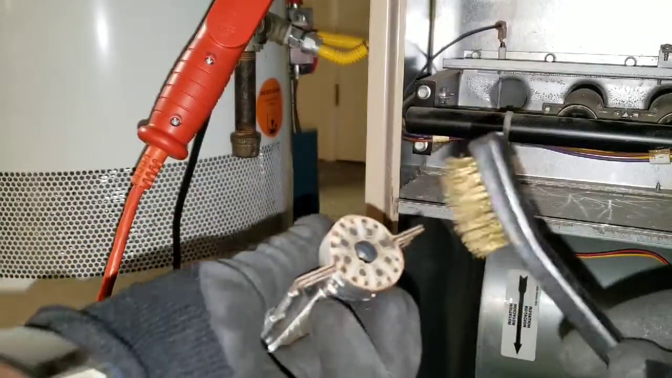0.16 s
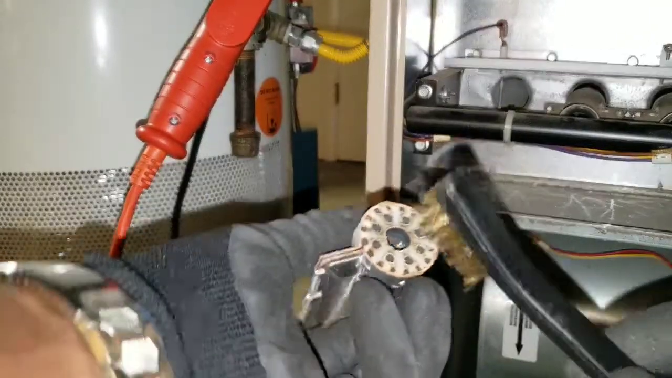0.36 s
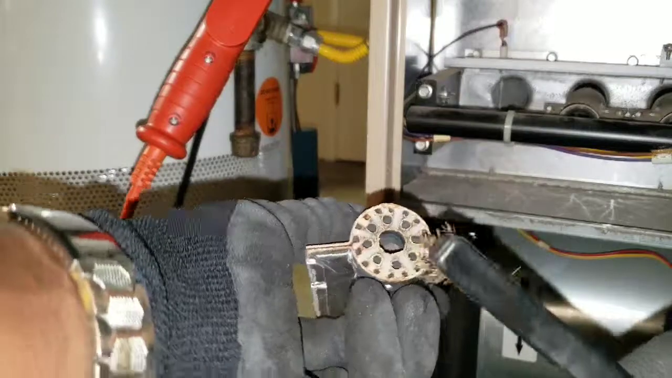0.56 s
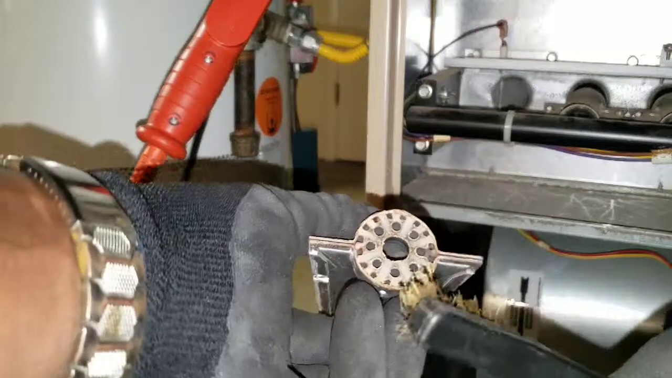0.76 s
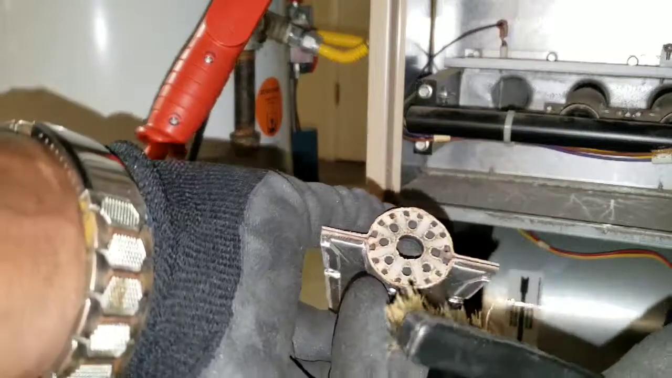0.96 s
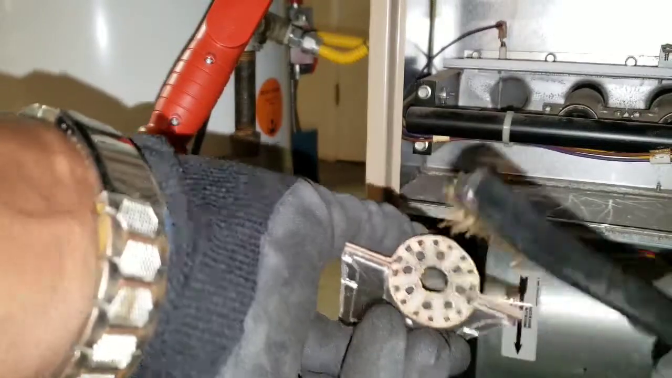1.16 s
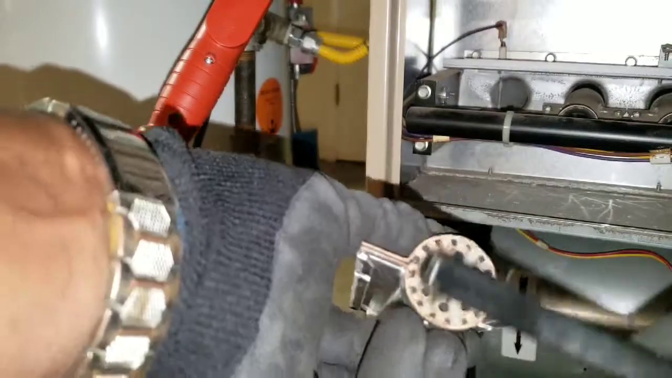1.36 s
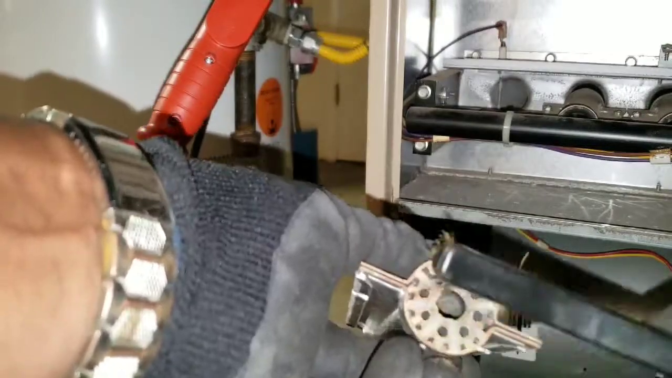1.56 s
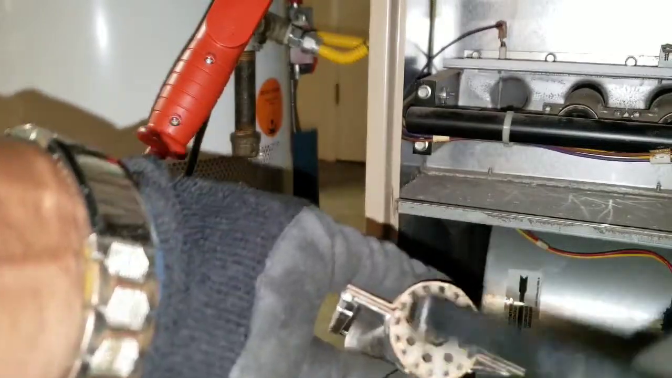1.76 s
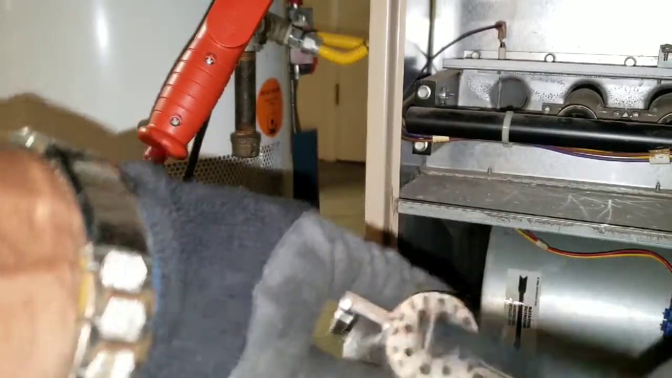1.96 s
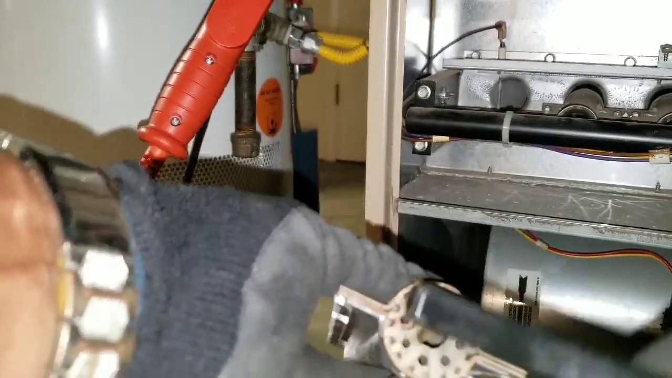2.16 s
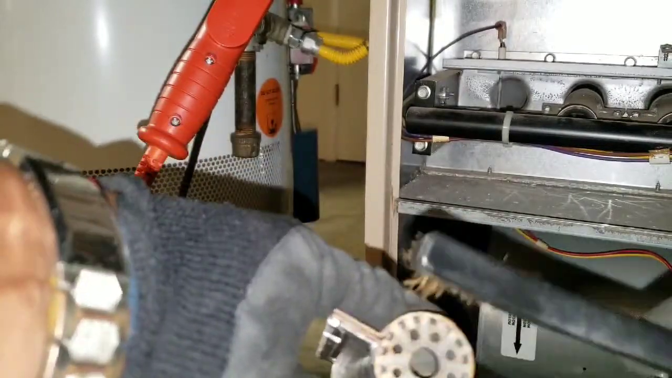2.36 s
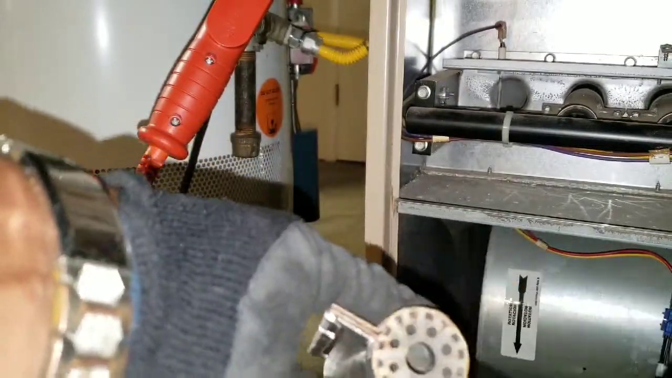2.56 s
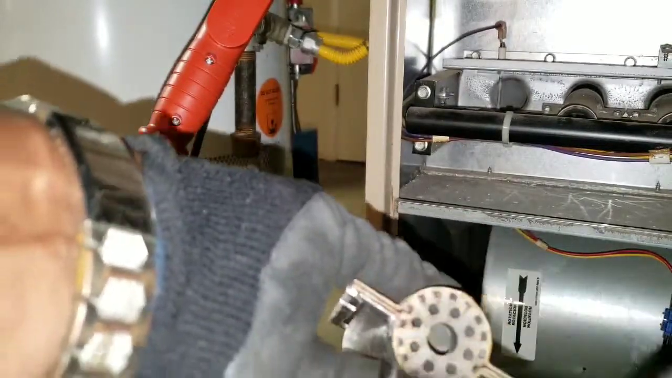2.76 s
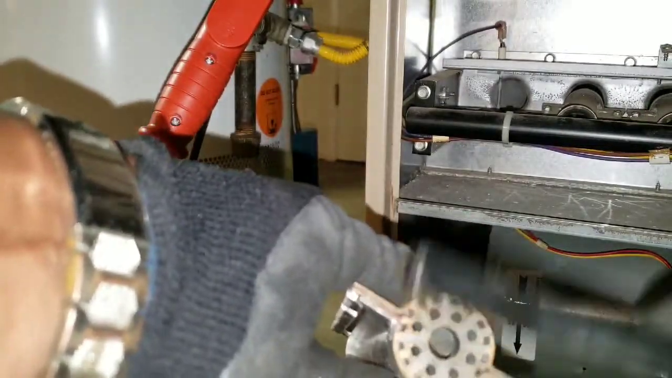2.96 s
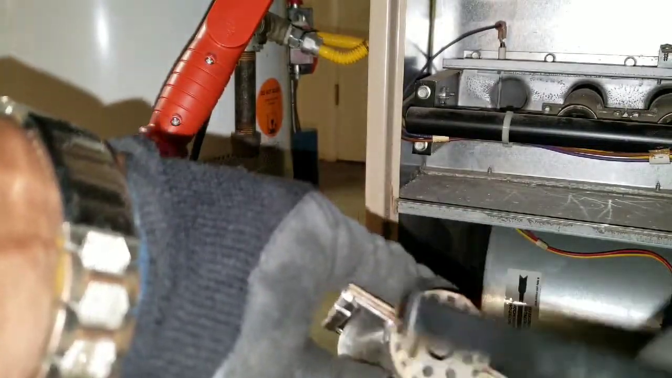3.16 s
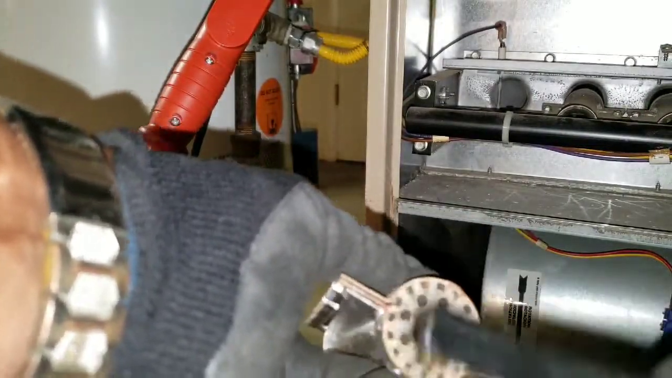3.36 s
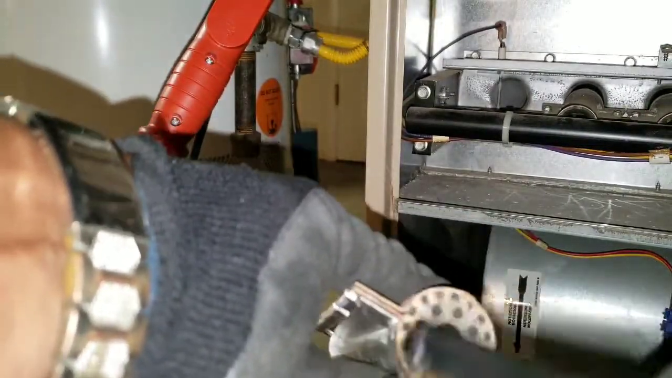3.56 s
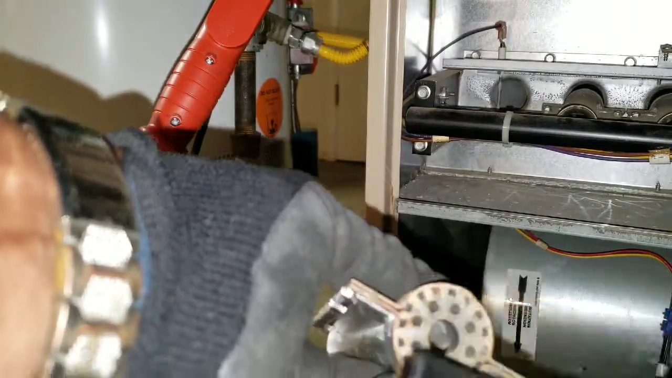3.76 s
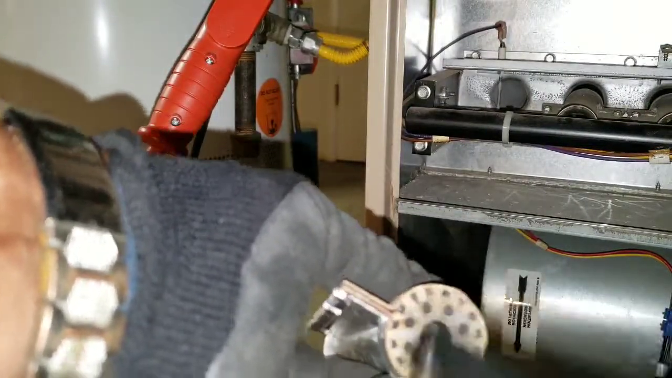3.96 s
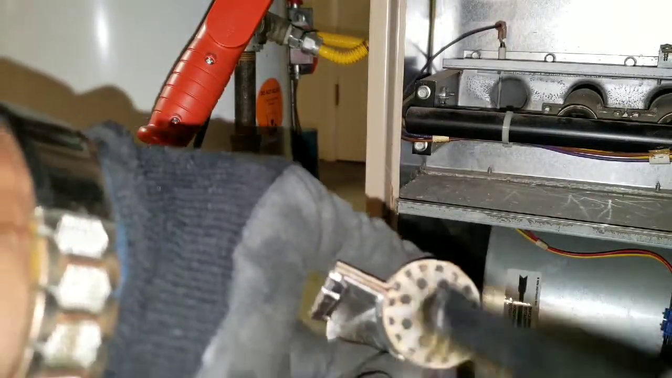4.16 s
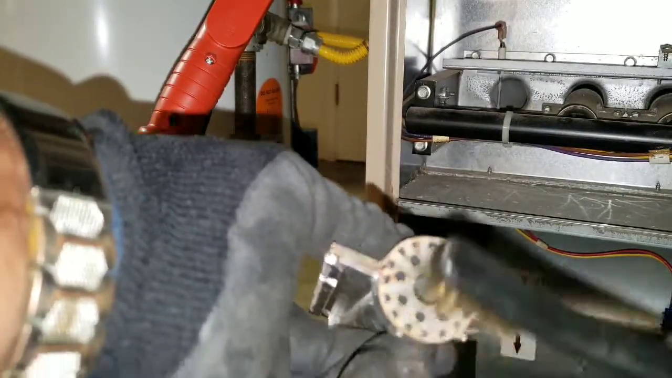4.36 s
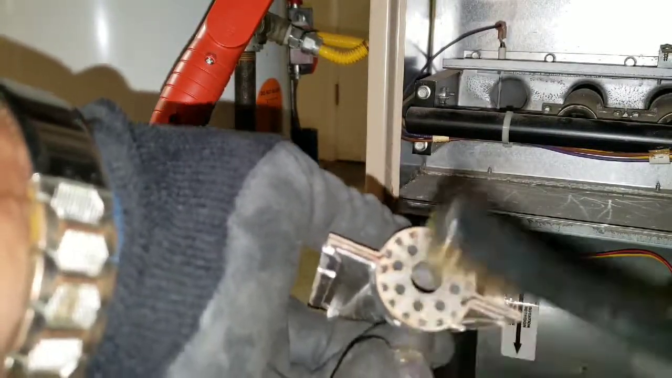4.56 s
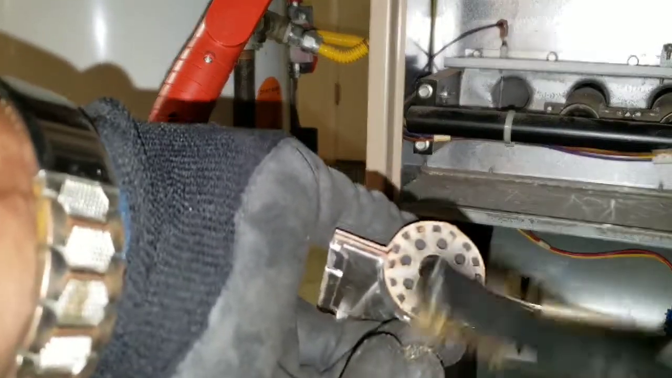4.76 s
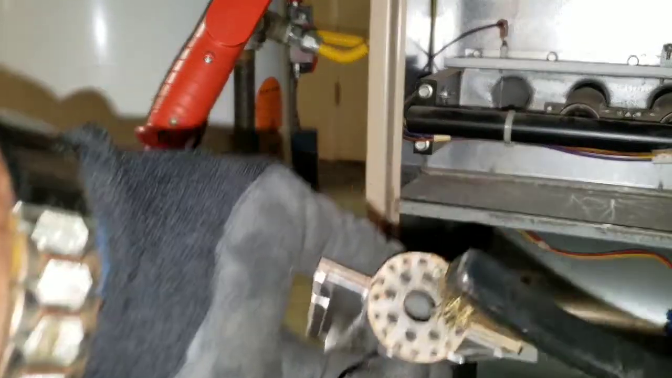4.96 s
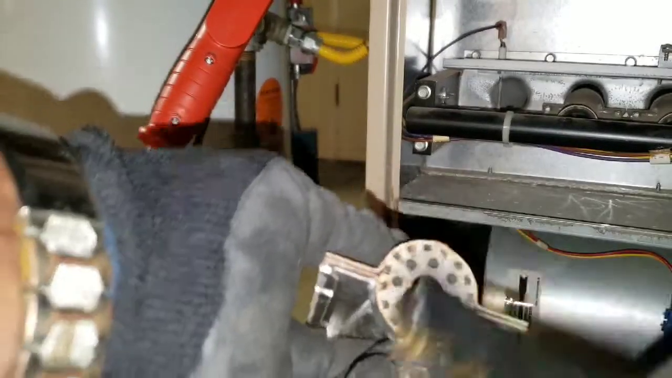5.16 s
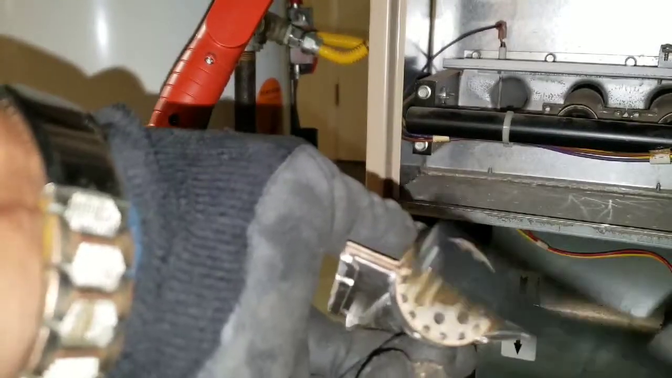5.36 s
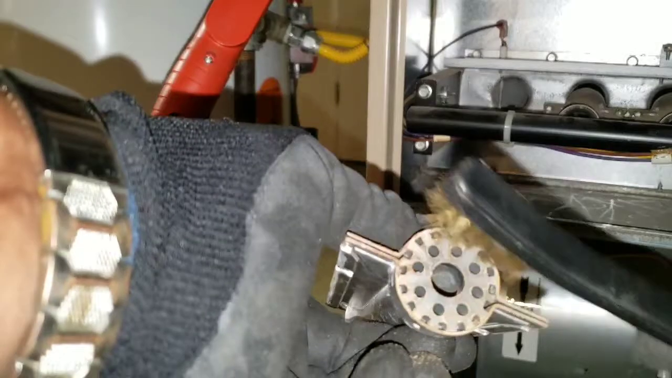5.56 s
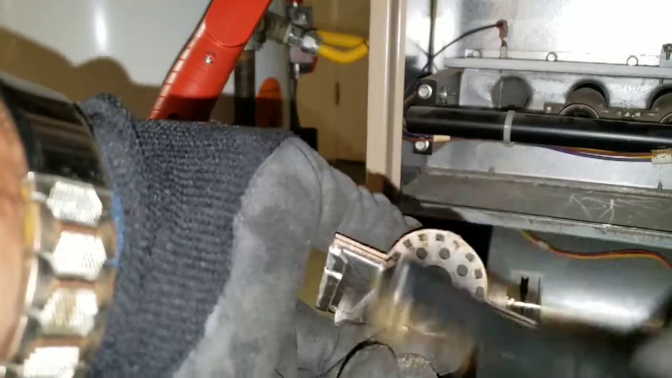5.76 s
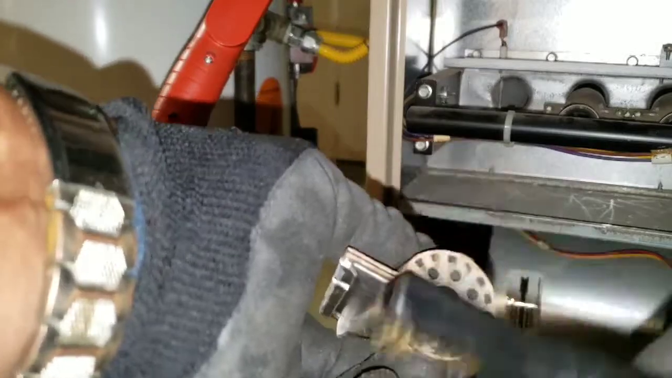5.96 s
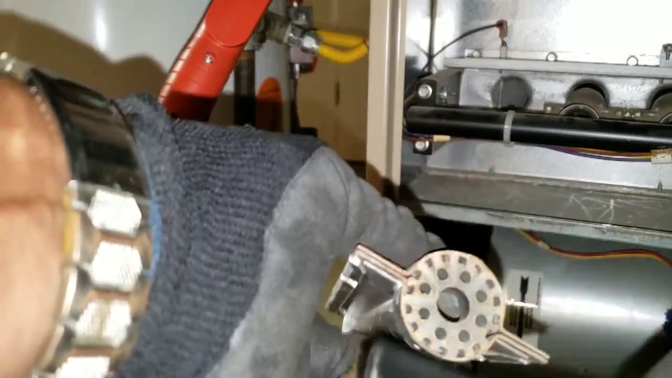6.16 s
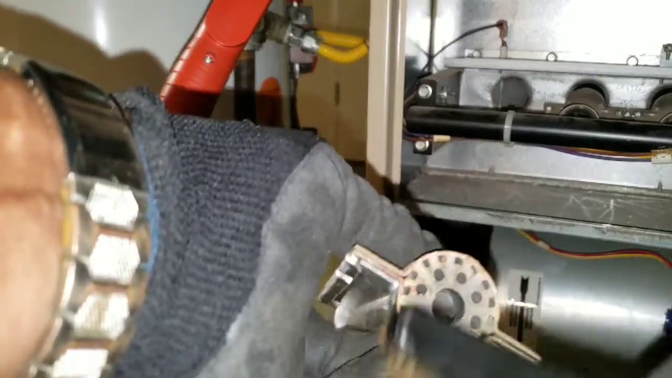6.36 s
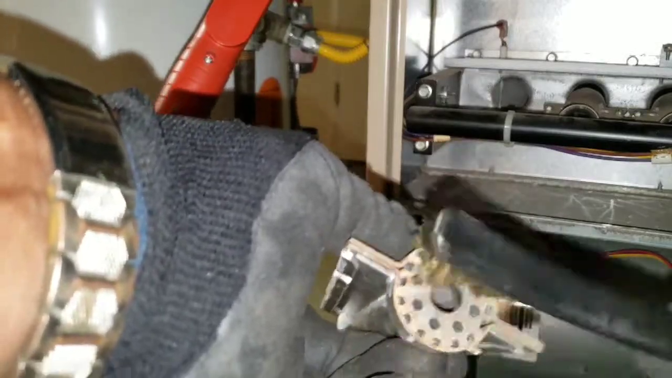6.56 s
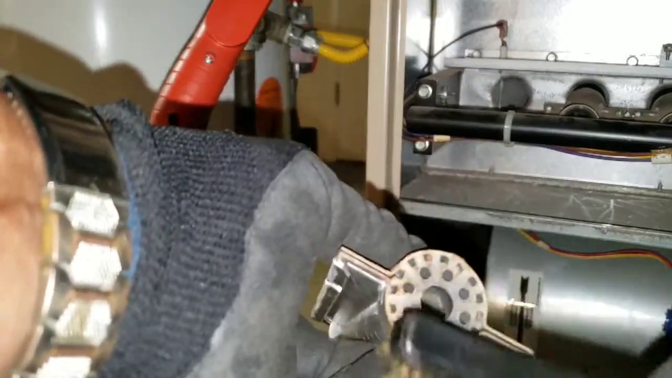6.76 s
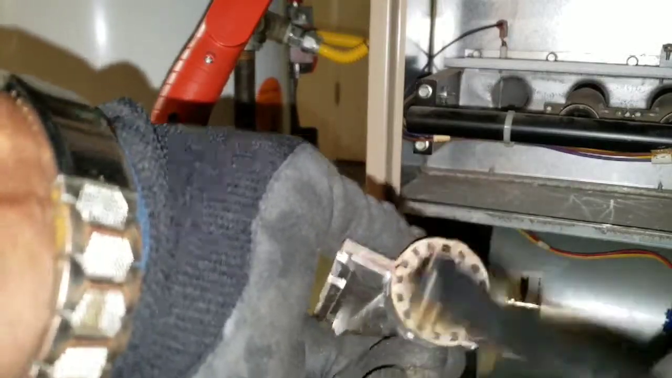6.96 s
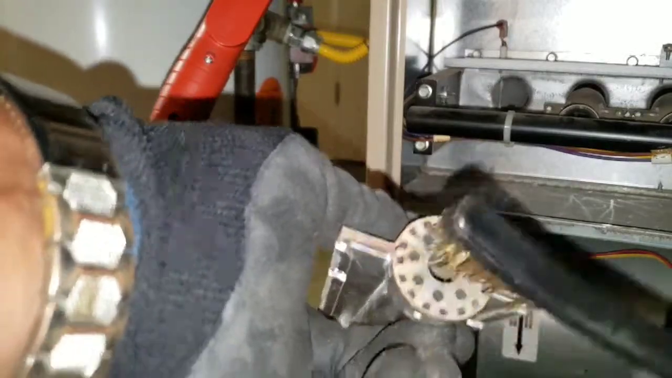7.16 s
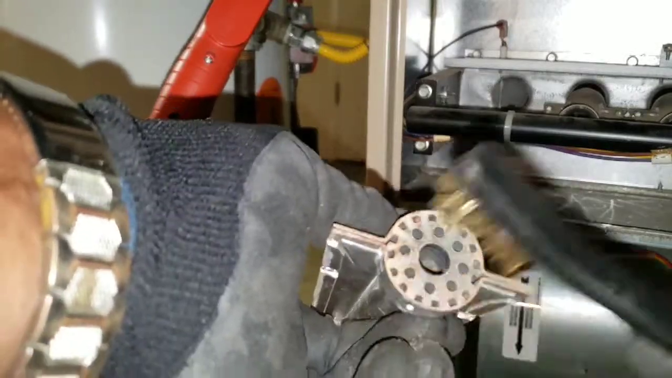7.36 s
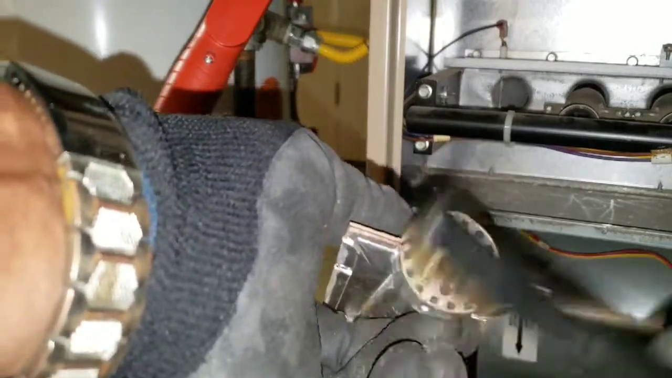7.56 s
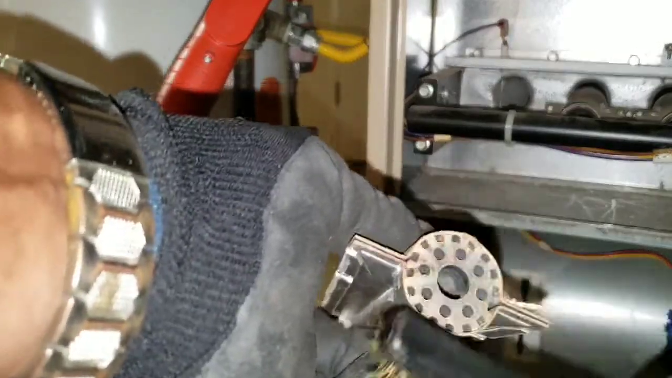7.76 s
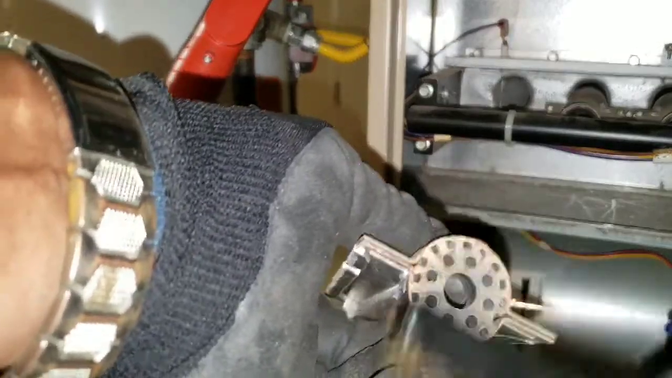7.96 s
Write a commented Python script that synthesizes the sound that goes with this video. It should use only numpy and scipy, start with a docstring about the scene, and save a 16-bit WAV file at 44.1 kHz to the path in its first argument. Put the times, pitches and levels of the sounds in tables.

```python
"""A small wire brush scrubs a metal burner held in a gloved hand, about four strokes a second. Random impulses
of wire tips, catching wires and pressed tufts pass through broad filters, while tips and tuft snaps also excite
faint, damped modes of the burner and the brush handle. The glove rustles, ticks and squeaks first. A short
diffuse tail makes the room small and dry; a low machine hum, a narrow rumble and room air lie behind."""
import sys
import numpy as np
from scipy import signal
from scipy.fft import rfft, irfft, next_fast_len
from scipy.io import wavfile

SR = 44100
rng = np.random.default_rng(int(sys.argv[2]) if len(sys.argv) > 2 else 0)


def wav_record(signal):
    """Record a signal, one row per channel, as 16-bit PCM in the file named by sys.argv[1]."""
    frames = np.transpose(np.atleast_2d(signal))
    bounded = np.clip(frames, -1, 1)
    # unit amplitude maps onto the largest positive 16-bit level
    quanta = np.round(bounded * 32767).astype(np.int16)
    wavfile.write(sys.argv[1], SR, quanta)


N = 353726  # length [samples]


def gain_of(db):
    """Logarithmic level: 20 dB is a factor of ten in amplitude."""
    return 10 ** (np.asarray(db) / 20)


def evened(x):
    """Power normalization: scales to an rms of one."""
    return x / np.sqrt(np.mean(x ** 2) + 1e-20)


def read(points, hz):
    """Interpolation along a logarithmic frequency axis."""
    f, value = np.transpose(points)
    return np.interp(np.log(hz + 1), np.log(f + 1), value)


def add(mix, s, sound):
    """Superposition: adds a sound into the mix in place, starting at s seconds."""
    part = mix[..., max(round(s * SR), 0):]
    part = part[..., :sound.shape[-1]]
    part += sound[..., :part.shape[-1]]


def colour(x, spectrum, band, size=4096):
    """Minimum-phase filtering: shapes the spectrum; white input keeps its rms within the band."""
    hz = abs(np.fft.fftfreq(size, 1 / SR))
    gain = gain_of(read(spectrum, hz))
    in_band = (hz > band[0]) * (hz < band[1])
    gain = gain / np.sqrt(np.mean(gain ** 2 * in_band))
    # the Hilbert transform of the log gain gives the phase of a causal filter
    response = np.exp(np.conj(signal.hilbert(np.log(gain))))
    taps = np.fft.ifft(response).real[:size // 2]
    return signal.oaconvolve(x, taps[None], axes=1)[:, :N]


def wander(length, rate_hz):
    """Low-passed random process: smooth chance with an rms of one."""
    size = next_fast_len(length, True)
    hz = np.fft.rfftfreq(size, 1 / SR)
    low_pass = (hz > 0) / (1 + (hz / rate_hz) ** 4)
    return evened(irfft(rfft(rng.standard_normal(size)) * low_pass, size)[:length])


def background(hum_hz=92.3, hum_db=-69, rumble_hz=56, rumble_width_hz=9, rumble_db=-71, lean_db=2.0):
    """Tonal and narrow-band noise: a machine's wavering hum and rumble over partly coherent room air."""
    # room air: (frequency [Hz], spectral density [dB per Hz, relative])
    air_spectrum = [(15, -33), (30, -14.5), (45, -15.5), (75, 1), (115, -6.5), (150, -15), (230, -25),
                    (275, -19), (340, -29.5), (600, -31.5), (2000, -34), (5000, -37), (9000, -40),
                    (14500, -35.5)]
    # left-right likeness of the air: (frequency [Hz], amplitude share [0..1])
    air_share = [(50, 1), (100, 0.8), (250, 0.59), (700, 0.087), (10000, 0.092)]
    air_db = -69.5
    size = next_fast_len(N, True)
    t, hz = np.arange(N) / SR, np.fft.rfftfreq(size, 1 / SR)
    left, apart = rfft(rng.standard_normal((2, size)))
    same = np.clip(read(air_share, hz), 0, 1)
    right = same * left + np.sqrt(1 - same ** 2) * apart
    air = irfft(np.array([left, right]) * gain_of(read(air_spectrum, hz)), size)[:, :N]

    hum_phase = 2 * np.pi * hum_hz * t + .5 * wander(N, 3)
    hum = evened(np.sin(hum_phase) * gain_of(3.0 * wander(N, 3.0)))

    envelope = wander(N, rumble_width_hz) + 1j * wander(N, rumble_width_hz)
    rumble = evened((envelope * np.exp(2j * np.pi * rumble_hz * t)).real)

    total = gain_of(air_db) * evened(air) + gain_of(hum_db) * hum + gain_of(rumble_db) * rumble
    return total * gain_of([[lean_db], [-lean_db]])  # left louder than right


def glove(squeak_db=-82, squeak_length_s=0.02, rise_hz_per_s=5000, tick_s=0.631, tick_db=-73, tick_length_s=0.005):
    """Friction noise: cloth rustles; the grip gives one faint tick and one tiny rising squeak."""
    # rustle as the hand gets ready, silent after the last row: (time [s], level [dB])
    rustle_levels = [(0, -70.5), (.08, -83), (.27, -74.5), (.34, -83.5), (.64, -96), (1.15, -102)]
    # colour of the rustling cloth: (frequency [Hz], spectral density [dB per Hz, relative])
    cloth = [(500, -10), (3500, -9.5), (5800, -11), (6700, -0.5), (7600, -3), (8600, -13), (11500, -4.5),
             (14500, -9)]
    # tick as the burner shifts in the grip: (frequency [Hz], spectral density [dB per Hz, relative])
    grip_shift = [(1000, -25), (2500, 2), (6000, -2), (9000, -13)]
    squeak_s, squeak_hz = 0.764, 3980
    t = np.arange(N) / SR
    level = gain_of(np.interp(t, *np.transpose(rustle_levels))) * (t < rustle_levels[-1][0])
    rustle = colour(level * rng.standard_normal((2, N)), cloth, (500, 14500))

    burst = gain_of(tick_db) * (t > tick_s) * np.exp(-abs(t - tick_s) / tick_length_s)
    tick = colour(burst * rng.standard_normal((2, N)), grip_shift, (2000, 7000))

    swell = gain_of(squeak_db) * np.exp(-((t - squeak_s) / squeak_length_s) ** 2)
    turns = np.cumsum(squeak_hz + rise_hz_per_s * (t - squeak_s)) / SR
    squeak = swell * np.sin(2 * np.pi * turns + wander(N, 70))  # the wandering phase roughens it
    return rustle + tick + squeak


def stroke(crest_s, length_s, crest_db, landing_db, drag_db, rasp_db, catch_db, scuff_db):
    """Contact force: tips, catching wires and tufts land, swell, ease off, drag over the rim and lift."""
    land_s, swell_curve, ease_s, lift_s = 0.01, 1.33, 0.04, 0.01
    scuff_share = 0.15  # share of the extra rasp that the low scuff takes
    t = np.arange(0, length_s + 6 * lift_s, 1 / SR)
    to_go = np.clip(1 - t / crest_s, 0, 1) ** swell_curve
    eased = np.clip((t - crest_s) / ease_s, 0, 1)
    hiss_db = crest_db + landing_db * to_go + drag_db * eased
    # the catching grows, or falls where catch_db is negative, from the crest to the rim
    caught_db = catch_db * np.interp(t, [crest_s, length_s], [0, 1])
    contact = np.minimum(t / land_s, 1) * np.exp(-np.maximum(t - length_s, 0) / lift_s)
    rasp_level = hiss_db + rasp_db + caught_db
    scuff_level = hiss_db + scuff_db + scuff_share * caught_db
    return contact * gain_of([hiss_db, rasp_level, scuff_level])


def slips(slip_hz=150, uneven=.45, fade_s=0.0034, spread_db=1.5):
    """Stick-slip: tufts jump out of the holes at uneven intervals; each jump dies away exponentially."""
    turns = np.cumsum(slip_hz * np.exp(uneven * wander(N, 90))) / SR
    jumps = np.diff(np.floor(turns), prepend=0)  # one impulse a whole turn
    jumps = jumps * gain_of(spread_db * np.clip(rng.standard_normal(N), -2, 2))
    return evened(signal.lfilter([1], [1, -np.exp(-1 / (fade_s * SR))], jumps))


def flicks(per_s, spread_db, clump_db, clump_hz):
    """Random impulse trains: wires stick and let go in clumps, in two independent channels."""
    size = gain_of(spread_db * np.minimum(rng.exponential(1, (2, N)), 5))
    sign = rng.choice([-1, 1], (2, N))
    struck = rng.random((2, N)) < per_s / SR
    return evened(size * sign * struck * gain_of(clump_db * wander(N, clump_hz)))


def brush(tip_jerk=0.67, catch_jerk=0.53):
    """Force-modulated impulses: strokes drive fine tip flicks, coarser catches and a low scuff."""
    # one row a stroke; levels drive the filters: (start [s], time to crest [s], length [s],
    # hiss at crest [dB], landing re crest [dB], dragging off re crest [dB], rasp re hiss [dB],
    # extra rasp by the end [dB], scuff re hiss [dB])
    stroke_rows = [(1.121, 0.097, 0.15, -47.5, -20, -21, -14.5, 22.5, -22),
                   (1.365, 0.104, 0.15, -49.5, -21, 0.0, -16.5, -0.5, -19),
                   (1.657, 0.008, 0.059, -57, 3, -10.5, -18, 10, -16),
                   (1.713, 0.063, 0.084, -43.5, -13, 0.5, -20, 2.0, -21),
                   (1.951, 0.12, 0.16, -46.5, -7, -26, -16, 8, -18),
                   (2.211, 0.094, 0.17, -40.0, -32.5, -16, -16.5, 17, -19.5),
                   (2.497, 0.076, 0.16, -40.5, -16.5, -25.5, -11.5, 17, -19),
                   (2.774, 0.061, 0.13, -44.0, -11.5, -12.5, -14, 0.5, -19),
                   (2.995, 0.075, 0.2, -45.5, -22, -5.5, -15.0, 2.5, -19),
                   (3.243, 0.11, 0.16, -47.5, -8.5, -4, -15, 4, -19.5),
                   (3.484, 0.062, 0.11, -44, -13.5, -8, -14.0, 0, -20.5),
                   (3.698, 0.082, 0.13, -40.5, -20, -14.5, -16, 3.5, -19.5),
                   (3.93, 0.058, 0.12, -37, -27, -15.5, -18, 9.5, -19),
                   (4.158, 0.061, 0.12, -37.5, -30, -13.5, -15, 10, -17.5),
                   (4.433, 0.031, 0.1, -41.5, -17.5, -11.5, -15.0, 3, -19),
                   (4.647, 0.05, 0.11, -54, 0.5, -7, -21, 2.0, -16.5),
                   (4.76, 0.04, 0.1, -45, -24, -30.5, -18, 12, -26),
                   (4.915, 0.028, 0.1, -39.5, -10.0, -12, -14.0, 2, -19.5),
                   (5.137, 0.073, 0.14, -40, -19.5, -22, -10, 15.5, -22.5),
                   (5.387, 0.077, 0.14, -40, -16, -14.5, -13, 20, -17.5),
                   (5.648, 0.032, 0.11, -47.0, -20, -7.5, -11, -3.0, -17),
                   (5.887, 0.066, 0.1, -39.5, -15.5, -41.5, -12, 19, -17),
                   (6.11, 0.068, 0.13, -43.5, -10, -12, -15.5, 9, -18),
                   (6.373, 0.074, 0.15, -43.0, -23.5, -13.5, -14, -1, -18),
                   (6.688, 0.089, 0.13, -42, -20.5, -13, -15, 1.5, -22),
                   (6.956, 0.058, 0.12, -38, -21.5, -18, -14.0, 16, -18),
                   (7.215, 0.038, 0.13, -42.5, -9, -10, -15, 14.5, -14),
                   (7.464, 0.073, 0.13, -40, -17.5, -30, -11, 22.5, -18.5),
                   (7.707, 0.067, 0.13, -40.5, -17.5, -28, -11, 21, -16.5),
                   (7.937, 0.066, 0.078, -43, -11.5, -6, -14.0, -2, -14)]
    tremble_db, tremble_hz = 0.83, 45  # the brush bumps over the holes
    force = np.zeros((3, N))
    for start, *shape in stroke_rows:
        add(force, start, stroke(*shape))
    force = force * gain_of(tremble_db * wander(N, tremble_hz))

    jerks = slips()  # one set of jerks shakes both tips and catching wires
    tips = flicks(per_s=16000, spread_db=2.0, clump_db=1, clump_hz=130)
    tips = tips * evened(np.hypot(1, tip_jerk * jerks))
    catches = flicks(per_s=4000, spread_db=2.0, clump_db=-1.5, clump_hz=165)
    catches = catches * evened(np.hypot(1, catch_jerk * jerks))
    tufts = flicks(per_s=1500, spread_db=1.5, clump_db=1.0, clump_hz=120)
    return force[0] * tips, force[1] * catches, force[2] * tufts


def snaps(snap_s=0.0043, knock_s=0.0017, size=1024):
    """Impulsive noise: a whole tuft snaps onto or off an edge, a burst decaying within milliseconds."""
    # tuft snaps, levels ahead of the filters: (time [s], bright snap [dB], dull knock [dB])
    snap_rows = [(1.183, -43.5, -62), (1.233, -45.5, -47), (1.272, -55, -42), (1.281, -59, -48.5),
                 (1.372, -60, -76), (2.062, -39, -69), (2.21, -48.5, -67), (2.222, -45.5, -72),
                 (2.357, -59, -43.5), (2.381, -57, -58), (2.569, -50, -44.5), (2.656, -46, -66),
                 (3.934, -47, -71), (4.167, -60, -75), (4.189, -42, -56), (4.212, -33, -56),
                 (4.26, -58, -40), (4.649, -52, -75), (4.682, -39.5, -55), (4.789, -42.5, -74),
                 (4.916, -46, -51), (5.139, -60, -65), (5.233, -34, -39.5), (5.482, -54, -37),
                 (5.518, -45, -47), (5.934, -52, -38), (6.955, -48.5, -56), (6.984, -38, -61),
                 (7.001, -36.5, -60), (7.071, -52, -44.5), (7.232, -38, -48), (7.282, -33.5, -37.5),
                 (7.345, -49, -40.5), (7.539, -46, -57), (7.94, -49.5, -66)]
    bright, dull = np.zeros((2, N))
    t = np.arange(size) / SR
    for s, snap_db, knock_db in snap_rows:
        add(bright, s, gain_of(snap_db) * np.exp(-t / snap_s))
        add(dull, s, gain_of(knock_db) * np.exp(-t / knock_s))
    return bright * rng.standard_normal((2, N)), dull * rng.standard_normal((2, N))


def burner(drive, ring_db=-15, size=16384):
    """Modal resonance: the wires excite the decaying modes of the burner and the brush handle, damped more or
    less by the glove."""
    # modes of the burner, the three lowest from the brush handle: (frequency [Hz], relative level [dB], 60 dB
    # decay time [s])
    modes = [(1214, -16, .03), (1432, -14, .035), (1678, -16, .04), (2956, -2.5, .05), (3070, -4, .035),
             (3439, -10, .06), (3867, -12, .05), (4685, -4, .09), (4843, -6.5, .09), (5763, -6, .075),
             (6215, -11, .03), (9894, -14, .03), (11846, -13, .04), (13790, -10, .04), (14412, -12, .04)]
    # how freely the burner rings as the grip shifts: (time [s], level re ring_db [dB])
    freedom = [(1.2, -0.5), (2.1, 3), (2.6, -3), (3.4, 3), (4.0, 1), (4.8, 6.5), (5.3, -5.5), (7.0, 2),
               (8.0, 0.5)]
    t = np.arange(size) / SR
    ring = np.zeros(size)
    for hz, db, t60 in modes:
        decay = gain_of(-60 * t / t60)
        ring += gain_of(db) * evened(decay * np.cos(2 * np.pi * hz * t))
    free = gain_of(ring_db + np.interp(np.arange(N) / SR, *np.transpose(freedom)))
    return signal.oaconvolve(drive * free, ring[None] / np.sqrt(size), axes=1)[:, :N]


def patchy(x, patchy_db=3.5, width_hz=260, last_s=0.039, size=512):
    """Time-varying filtering: smooth random gains make the noise patchy, its colour changing softly."""
    hz, t, z = signal.stft(x, SR, nperseg=size, noverlap=size * 3 // 4)
    across, along = np.fft.rfftfreq(len(hz), hz[1]), np.fft.fftfreq(len(t), t[1])
    # random gains, smoothed over frequency and over time
    smooth = np.exp(-(across * width_hz) ** 2 - (along[:, None] * last_s) ** 2)
    grain = np.fft.rfft2(rng.standard_normal((2, len(t), len(hz))))
    field = evened(np.fft.irfft2(grain * smooth, (len(t), len(hz))))
    gain = evened(gain_of(patchy_db * np.clip(field, -3, 2))).transpose(0, 2, 1)
    return signal.istft(z * gain, SR, nperseg=size, noverlap=size * 3 // 4)[1][:, :N]


def wires(tips, catches, tufts, hiss_db=-0.5, rasp_db=-1, scuff_db=-3.5):
    """Source-filter principle: broad spectra turn the contact impulses into hiss, rasp and scuff."""
    # wire tips: (frequency [Hz], spectral density [dB per Hz, relative])
    tip_spectrum = [(300, -17), (700, -10), (1200, -18), (2300, -15), (3200, 3.5), (4200, 2.5), (5500, 6.5),
                    (7000, 7.5), (8700, 3), (10500, 6), (13000, 7), (15000, 4)]
    # catching wires: (frequency [Hz], spectral density [dB per Hz, relative])
    catch_spectrum = [(200, -19), (600, -23), (900, -11), (1300, -1), (1750, 0.5), (2300, -1), (3200, -1),
                      (4300, -3), (7000, -9.5), (15000, -35)]
    # pressed tufts: (frequency [Hz], spectral density [dB per Hz, relative])
    tuft_spectrum = [(60, 2.5), (150, 1), (275, 2), (360, -0.5), (470, -1), (620, -3), (780, 2.5),
                     (1050, -1.5), (1400, -14.5), (2500, -32.5)]
    hiss = colour(tips, tip_spectrum, (4000, 14500))
    rasp = colour(catches, catch_spectrum, (1000, 2500))
    scuff = colour(tufts, tuft_spectrum, (250, 850))
    scuff = patchy(scuff, patchy_db=7.5, width_hz=84, last_s=0.064, size=1024)
    return gain_of(hiss_db) * hiss + gain_of(rasp_db) * rasp + gain_of(scuff_db) * scuff


def ports(trains):
    """Partial coherence: part of the sound reaches both microphone ports alike, part differs."""
    # likeness of the ports, clipped below to 0...0.9: (frequency [Hz], amplitude share)
    port_share = [(100, 0.6), (500, -0.2), (1200, 1.5), (1800, -0.9), (2400, 0.85), (4500, -0.24),
                  (7000, 0.43), (14000, -0.2)]
    # phase lead of the left port: (frequency [Hz], lead [rad])
    left_lead = [(100, 1.5), (3900, 0.86), (4650, 7.5), (5100, -8.5), (5800, -14), (6700, -10.5),
                 (7800, -17), (9700, -13.5), (10400, -22), (14000, -23)]
    # level difference of the ports: (frequency [Hz], left minus right [dB])
    left_lean = [(200, 3.1), (500, 5.2), (1200, 3.4), (3000, 2.2), (6000, 2.2), (9000, 3), (13000, 6.1)]
    size = next_fast_len(N, True)
    hz = np.fft.rfftfreq(size, 1 / SR)
    left, apart = rfft(trains, size)
    same = np.clip(read(port_share, hz), 0, .9)
    lead = read(left_lead, hz)
    shade = gain_of(-read(left_lean, hz))
    right = shade * (same * np.exp(-1j * lead) * left + np.sqrt(1 - same ** 2) * apart)
    middle = np.sqrt(1 + shade ** 2 + 2 * shade * same * np.cos(lead)) / 2  # keeps the level of the sum
    return irfft(np.array([left, right]) / middle, size)[:, :N]


def room(x, wet_db=-14, build_s=0.00095):
    """Reverberation: a diffuse noise tail, each band dying at its own speed."""
    # decay of the room: (frequency [Hz], 60 dB decay time [s])
    room_decay = [(250, 0.45), (1500, 0.24), (5000, 0.29), (14000, .24)]
    hz, t, z = signal.stft(rng.standard_normal((2, SR // 2)), SR, nperseg=256)
    decay = gain_of(-60 * t / read(room_decay, hz)[:, None])
    build = 1 - np.exp(-t / build_s)
    tail = signal.istft(z * decay * build, SR, nperseg=256)[1]
    tail = tail / np.linalg.norm(tail[0])
    return gain_of(wet_db) * signal.fftconvolve(x, tail, axes=1)[:, :N]


def scene():
    """Superposition of direct and reverberant scrubbing, the glove and the background."""
    tips, catches, tufts = brush()
    bright, dull = snaps()
    contact = wires(tips + bright, catches + dull, tufts)
    ringing = burner(tips + bright)
    scrub = ports(patchy(contact + ringing))
    return scrub + room(scrub) + glove() + background()


def record(dry):
    """Band limiting: a linear-phase low-pass at the recorder's upper edge."""
    edge_hz = 14800
    taps = signal.firwin(301, edge_hz, window=("kaiser", 8), fs=SR)
    return signal.oaconvolve(dry, taps[None], "same")


dry = scene()
out = record(dry)
wav_record(out)
```